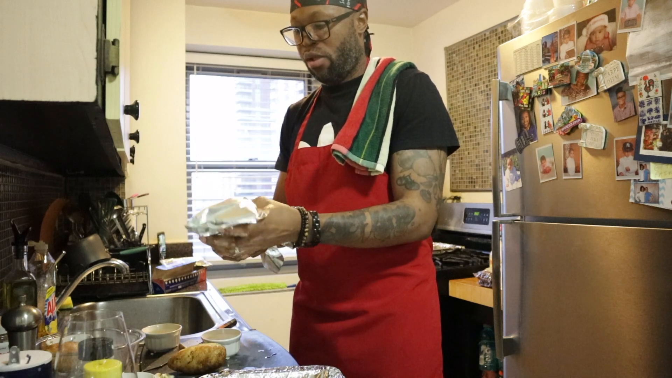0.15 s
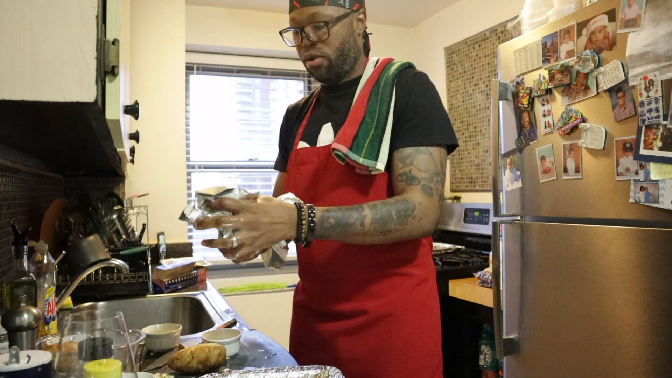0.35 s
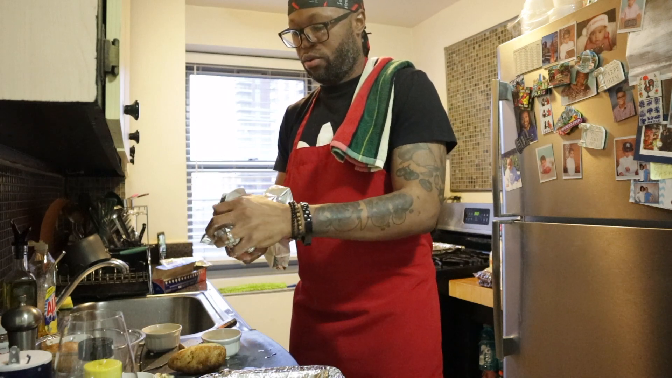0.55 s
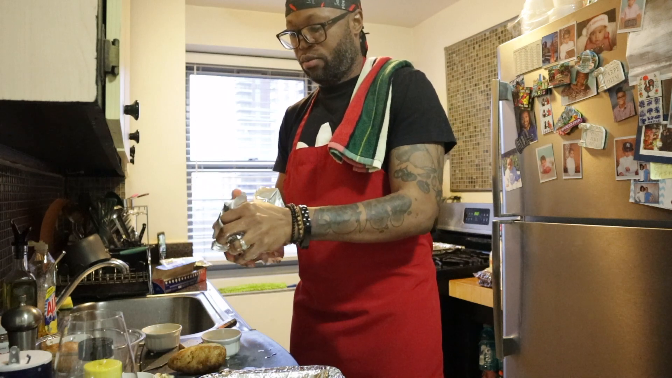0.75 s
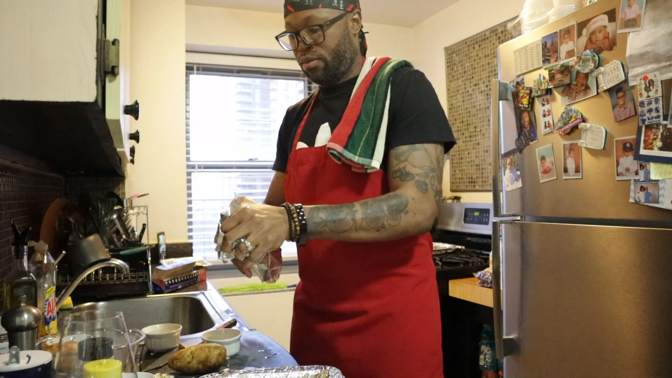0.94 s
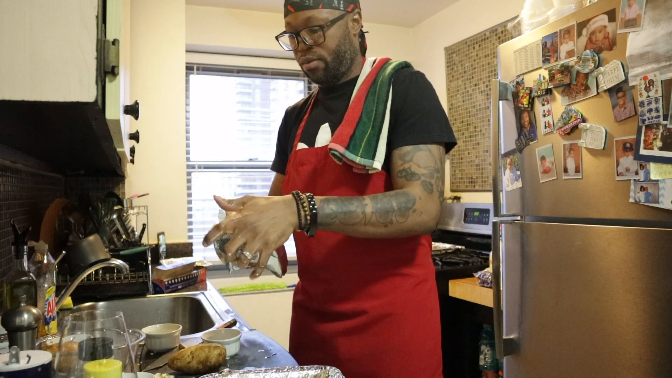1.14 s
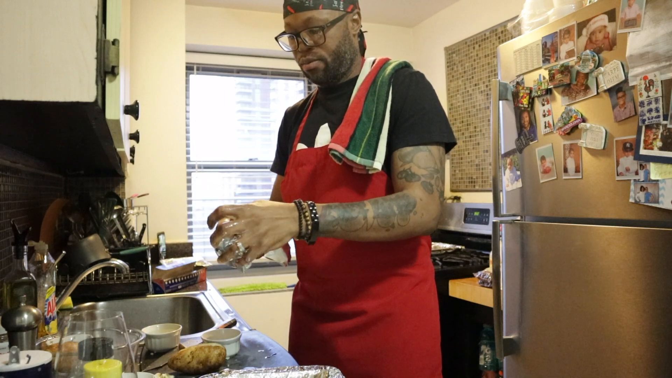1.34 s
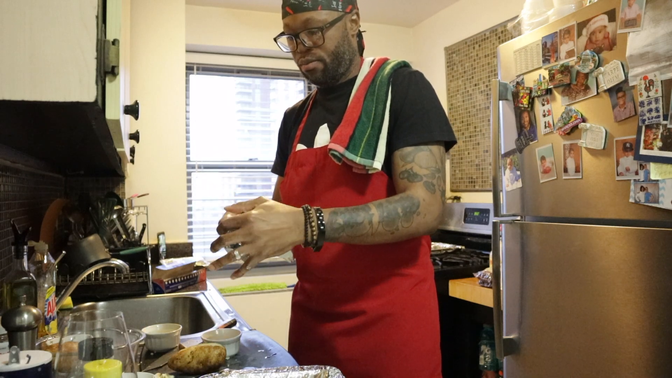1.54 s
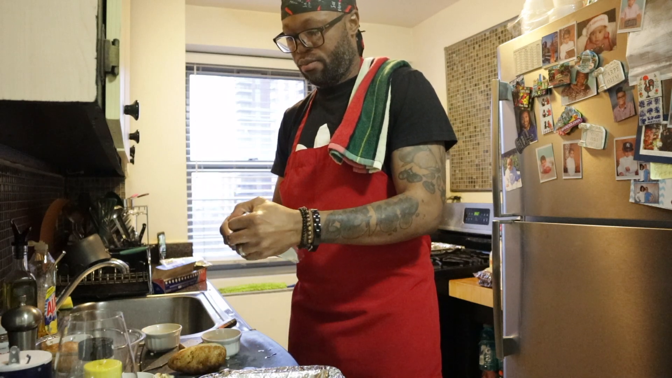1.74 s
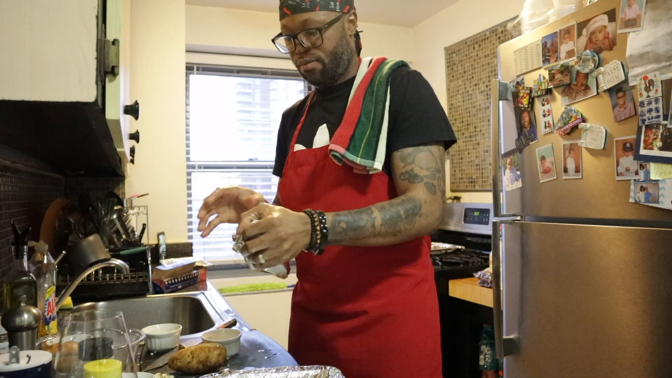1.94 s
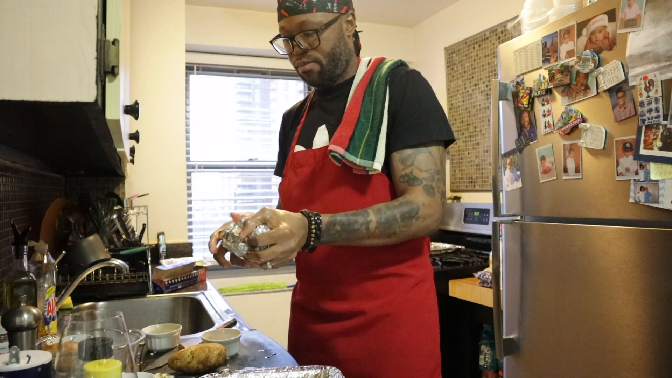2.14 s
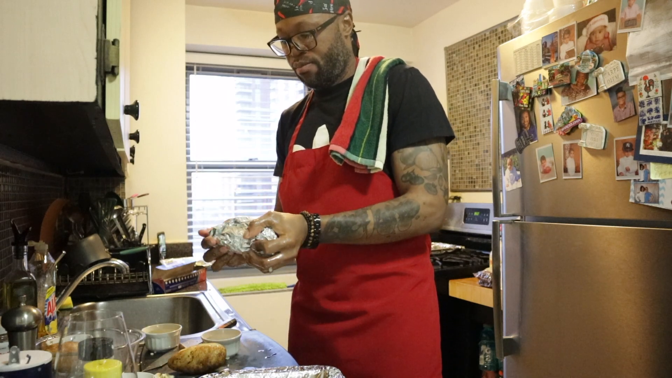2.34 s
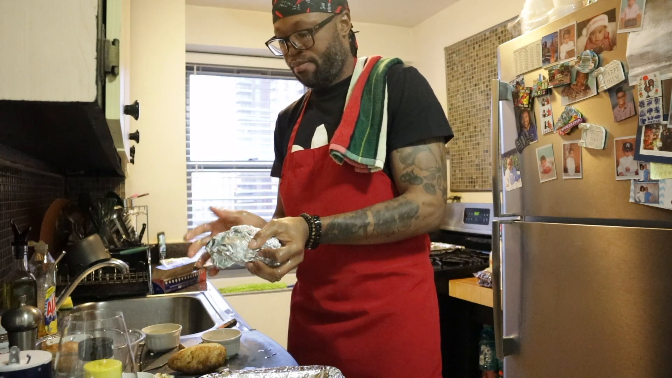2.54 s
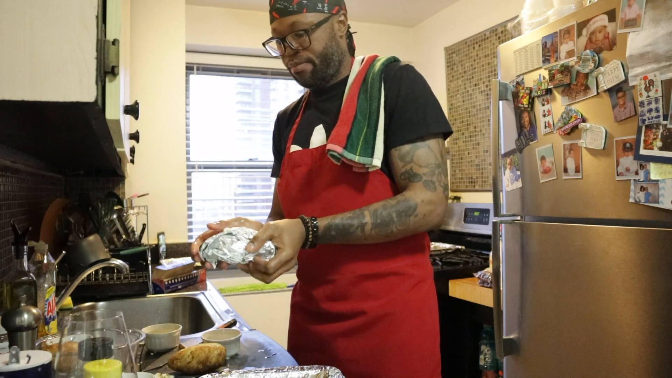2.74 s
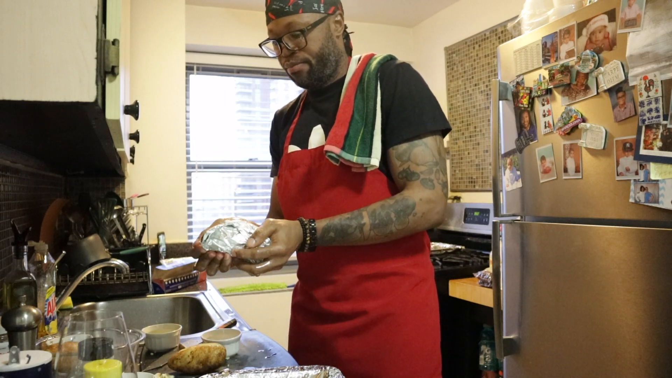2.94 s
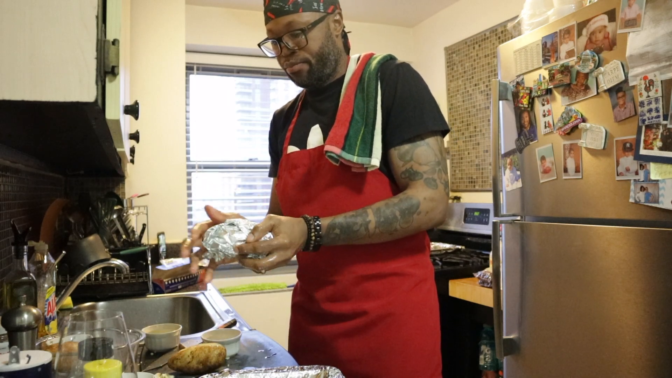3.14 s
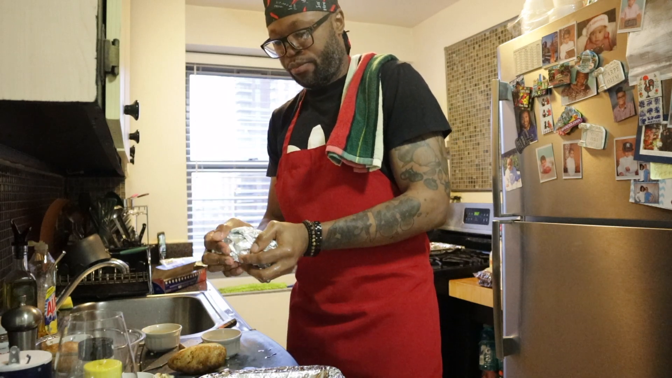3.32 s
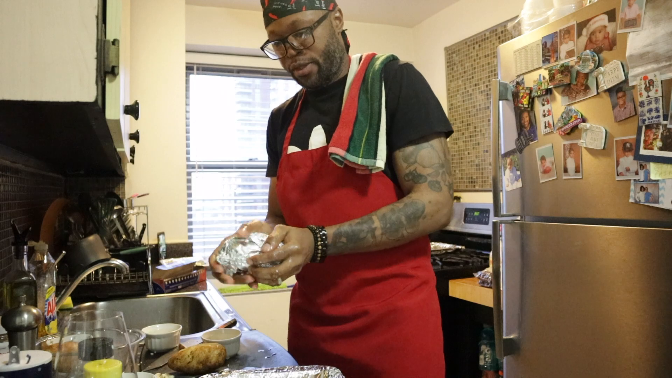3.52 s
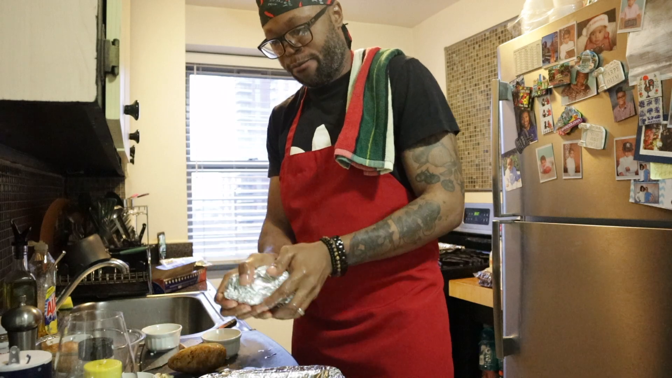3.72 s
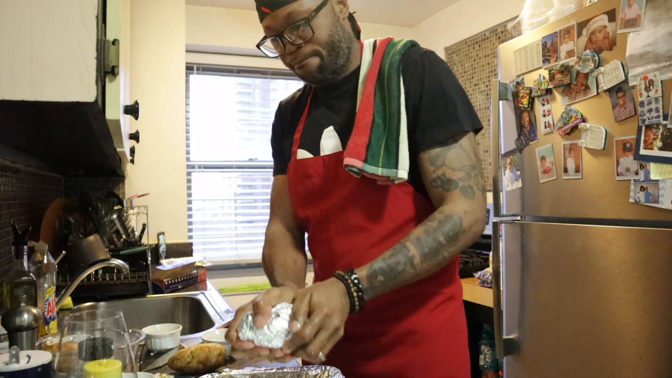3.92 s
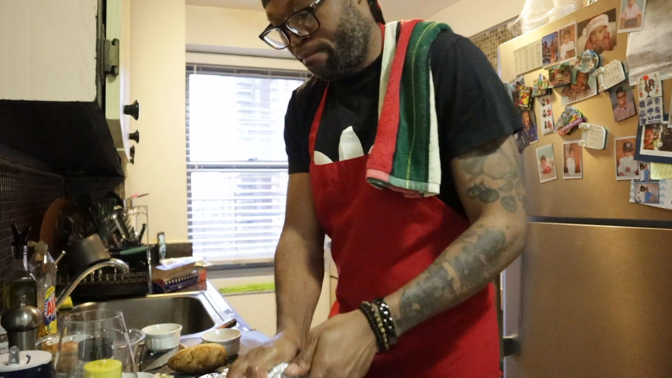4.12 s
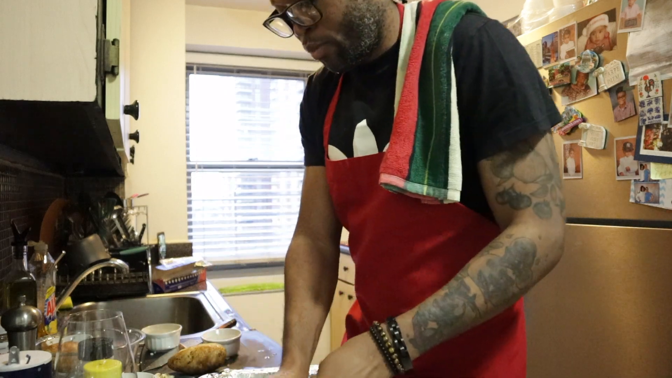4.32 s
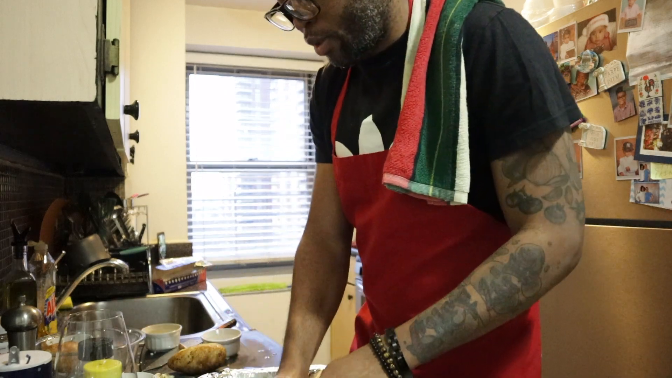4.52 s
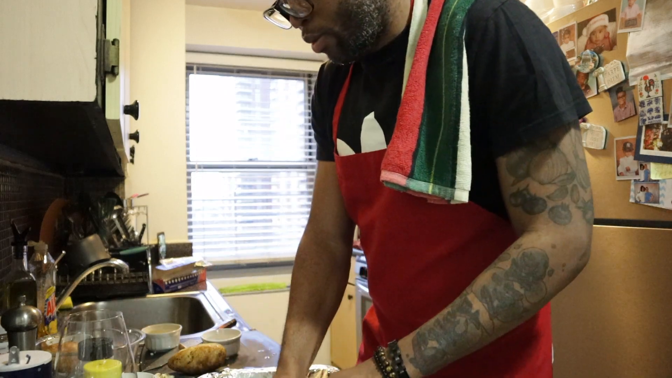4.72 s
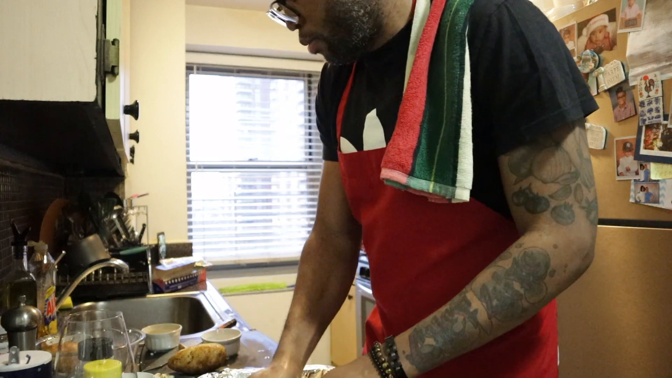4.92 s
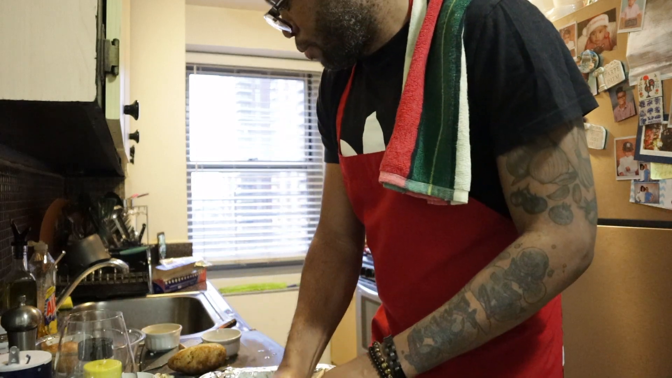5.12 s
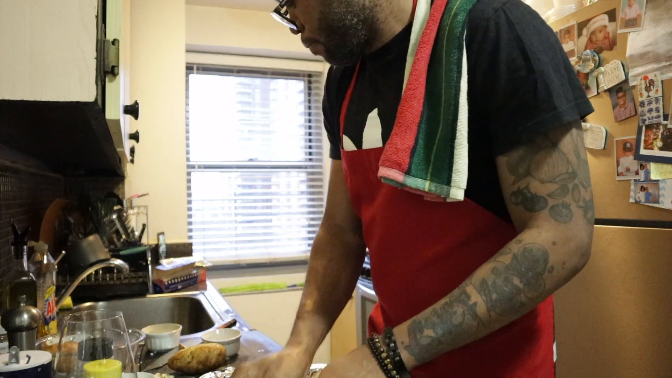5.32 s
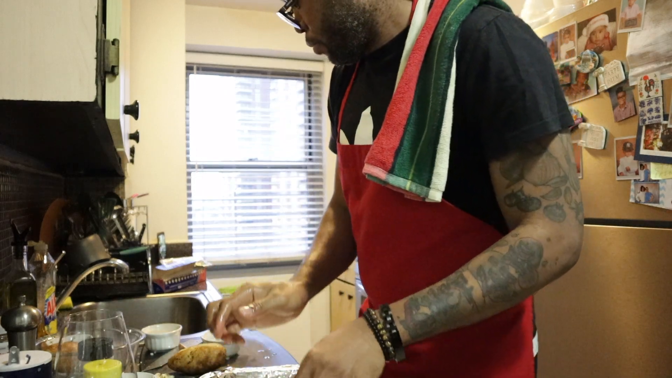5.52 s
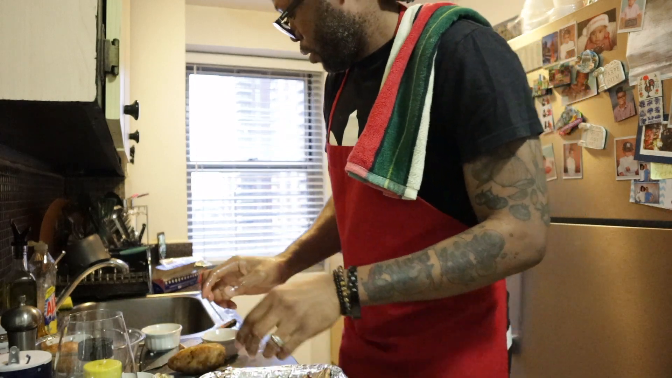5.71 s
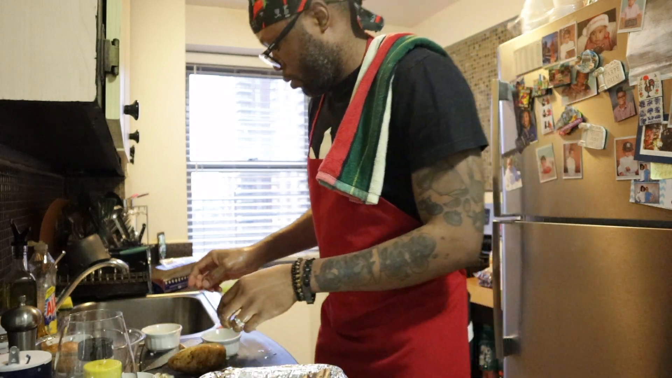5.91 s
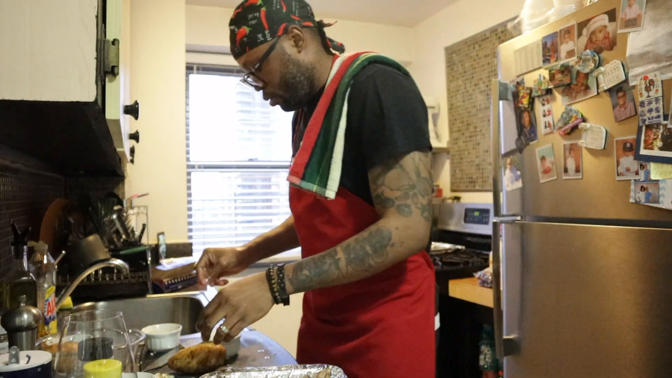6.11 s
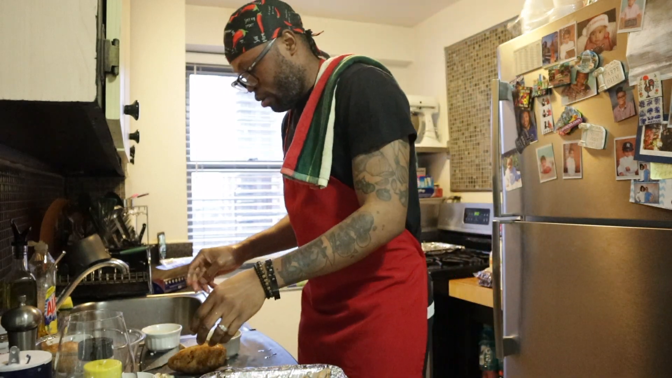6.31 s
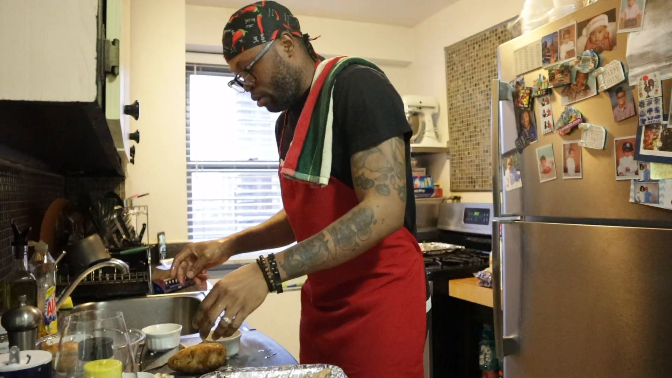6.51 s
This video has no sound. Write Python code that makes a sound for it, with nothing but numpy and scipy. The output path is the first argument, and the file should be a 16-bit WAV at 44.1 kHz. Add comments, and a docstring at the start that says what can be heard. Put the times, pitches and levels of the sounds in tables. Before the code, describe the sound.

Close, crackling foil is wrapped and pressed around a potato with dull bumps, ending with a dish tapping and sliding.

```python
"""Wrapping a potato in foil

A small kitchen, one microphone close to the counter, an appliance humming behind. Hands wrap aluminium
foil around a potato, squeeze it tight and press it down with dull bumps. Creases buckle in swarms of
tiny snaps, with single loud ones among them; on the counter the parcel takes on a hollow note.
At the end a dish is knocked lightly and slid over the counter."""
import sys
import numpy as np
from scipy import signal
from scipy.fft import rfft, irfft, next_fast_len
from scipy.io import wavfile
from scipy.ndimage import uniform_filter1d

SR = 44100
rng = np.random.default_rng(int(sys.argv[2]) if len(sys.argv) > 2 else 0)


def store_pcm(level_fs):
    """Save levels as 16-bit WAV."""
    pcm = np.round(np.clip(level_fs, -1, 1) * 32767).astype(np.int16)
    wavfile.write(sys.argv[1], SR, np.atleast_2d(pcm).T)


N = 289330
TIME = np.arange(N) / SR

# room tone: (frequency [Hz], relative level [dB])
ROOM_TONE = [(20, -18), (35, -9), (48, -9.5), (70, -2), (115, -3.5), (270, -1), (430, -3.5), (600, -9),
             (1050, -9.5), (1500, -15), (2200, -19.5), (5000, -23.5), (7000, -28.5), (15500, -31)]
# appliance in the background: (frequency [Hz], level [dB])
HUM_PARTIALS = [(74, -64.5), (91.5, -61), (153.5, -54), (243, -56.5), (294, -55.5), (344.5, -68),
                (414.7, -58.5)]
# decay of the kitchen: (frequency [Hz], t60 [s])
ROOM_DECAY = [(200, 0.29), (1000, 0.25), (3500, 0.22), (8000, 0.38), (15000, 0.089)]
# reverberation against the direct sound: (frequency [Hz], gain [dB])
ROOM_WET = [(1000, -3), (5000, -4), (9000, -7)]
# friction of the sliding dish: (time [s], level [dB])
SLIDE_LEVELS = [(5.86, -65), (5.916, -46), (5.952, -64), (5.956, -50), (6.106, -44.5), (6.202, -52.5),
                (6.304, -30), (6.38, -27.5), (6.476, -33), (6.56, -48.5)]
# colour of the sliding hiss as heard through the microphone: (frequency [Hz], relative level [dB])
HISS_AT_MIC = [(300, -15), (650, -10), (950, -3), (1600, -5.5), (2050, -1), (2700, 2.5), (3100, -3.5),
               (3600, 4), (4550, -6.5), (5200, -3), (6300, -11.5), (8000, -19.5), (11000, -26),
               (15500, -39)]
# light knocks on the dish: (time [s], peak level [dB])
DISH_KNOCKS = [(5.872, -37), (5.956, -27), (5.977, -37), (6.225, -36)]
# ring of the dish: (frequency [Hz], relative level [dB], t60 [s])
DISH_MODES = [(460, 1.5, 0.077), (563, 2, 0.027), (710, 5, 0.04), (820, 3, .035), (1083, 5.5, 0.051),
              (1250, -2, 0.041), (2350, -13, .04), (2920, -9, .04), (3460, -15, .04)]
# palms and counter bump the potato: (time [s], peak level [dB])
POTATO_BUMPS = [(.17, -38), (.47, -30), (.78, -29), (1.079, -41), (1.81, -33.5), (2.10, -29.5),
                (2.136, -29), (2.26, -35), (2.65, -32), (3.77, -38)]
# colour of a bump: (frequency [Hz], relative level [dB])
BUMP_COLOUR = [(60, -27), (150, 2), (350, 11.5), (700, 8.5), (1200, -5), (4000, -48)]
# the parcel lies on the counter: (time [s], contact [0-1])
COUNTER_CONTACT = [(4.33, 0.3), (4.4, 1), (4.74, 1), (4.82, 0.7), (5.1, 0.46), (5.3, 0.2)]
# colour of the crinkling as heard through the microphone: (frequency [Hz], relative level [dB])
CRINKLE_AT_MIC = [(130, -23), (300, -12.5), (560, -10), (850, -4), (1400, -3.5), (1800, -5.5), (2700, 1),
                  (3100, 0), (3550, 4), (4300, -3), (5100, -.5), (6600, -9), (11500, -9.5), (15800, -22)]
# squeezes; body (lows, wide panels) and sparkle (highs, tight creases) are relative to crackle (mids):
# (start [s], build-up [s], hold [s], crackle [dB], body [dB], sparkle [dB])
HAND_SQUEEZES = [(-0.034, 0.024, 0.072, -31.5, -6.5, -7.5), (0.087, 0.061, 0.044, -24.0, -7.5, -8.5),
                 (0.233, 0.071, 0.305, -27.0, -6.5, -7.5), (0.619, 0.057, 0.007, -29.5, -7.0, -7.0),
                 (0.73, 0.018, 0.086, -31.5, -4.0, -10.0), (0.886, 0.053, 0.043, -31.0, -5.5, -7.0),
                 (0.996, 0.026, 0.08, -27.0, -9.5, -8.0), (1.187, 0.061, 0.065, -29.0, -8.5, -9.5),
                 (1.328, 0.142, 0.088, -32.0, -9.5, -8.0), (1.499, 0.038, 0.011, -26.5, -7.5, -11.0),
                 (1.583, 0.053, 0.045, -28.5, -10.0, -7.5), (1.766, 0.088, 0.025, -28.5, -8.0, -7.5),
                 (2.074, 0.036, 0.208, -25.0, -7.0, -8.5), (2.332, 0.022, 0.132, -33.0, -10.0, -8.5),
                 (2.506, 0.039, 0.077, -32.0, -13.0, -8.0), (2.645, 0.013, 0.134, -27, -10.0, -7.5),
                 (2.852, 0.049, 0.058, -32.5, -9.0, -5.5), (3.032, 0.056, 0.089, -41.0, -12.5, -4.0),
                 (3.151, 0.054, 0.03, -29.5, -12.5, -7.0), (3.408, 0.084, 0.007, -31.0, -9.0, -6.5),
                 (3.573, 0.013, 0.114, -38.0, -12.5, -6.5), (3.752, 0.013, 0.139, -41.0, -7.5, -3.0),
                 (4.088, 0.06, 0.007, -39.0, -6.0, -6.5), (4.184, 0.013, 0.105, -43.5, -2.0, -8.0),
                 (4.329, 0.048, 0.032, -25.5, -8.5, -4.0), (4.428, 0.077, 0.211, -30.0, -7.0, -6.5),
                 (4.766, 0.07, 0.048, -35.0, -9.5, -8.5), (4.888, 0.053, 0.116, -32.0, -7.5, -8.5),
                 (5.133, 0.027, 0.018, -44.0, -7.0, -14.0), (5.279, 0.022, 0.075, -46.5, -2.0, -7.5)]
# fingers resting on the foil between squeezes: (body [dB], crackle [dB], sparkle [dB])
RESTING_TOUCH = (-59, -55.5, -57.5)
# loud single buckles: (time [s], crackle [dB], relative body [dB], relative sparkle [dB])
LOUD_BUCKLES = [(0.098, -23, -9, -14), (.1426, -22.5, -10, -11), (.1578, -26.5, 0, 3),
                (.193, -24, -20, 0.5), (.468, -26, -2.5, -14), (.823, -23.5, -7, -23),
                (0.888, -28.5, -15, -0.5), (1.0093, -24, -15, -21), (1.092, -25, -10, -8),
                (1.1662, -25.5, -8, -10), (1.226, -25, -9, -10), (1.29, -24.5, -15, -6),
                (1.4332, -26.5, -20, -7), (2.083, -35, -8, -10), (2.501, -37, -17, 9.5),
                (2.527, -23, -10.5, -16), (2.6444, -23, -17, -13), (2.7753, -19.3, -17, -14),
                (2.8228, -20.5, -14, -28), (3.0135, -36.5, -20.5, 2), (3.058, -30.5, -20, -14),
                (3.115, -23, -18, -16), (3.143, -22, -18.5, -4.5), (3.194, -24, -23, -22),
                (3.5847, -33, -17, -2), (3.6517, -29, -24, -6.5), (3.7327, -36, -22, -16),
                (3.7707, -28.5, -6, -8.5), (3.82, -34, -25, -6), (3.857, -41, -20, 7.5),
                (3.87, -44, -18, 8), (3.917, -47, -16, 11), (4.1904, -37, -21, 3), (4.2038, -31, -9, -4),
                (4.344, -33.5, -14, 4), (4.365, -28.5, -7.5, -1.5), (4.4723, -26, -21, -4),
                (4.6213, -21, -18, -7), (4.6415, -22.5, -11, -11), (4.6982, -24.5, -3.5, -13),
                (4.8457, -27.5, -22, -15), (4.9024, -23.5, -12, -12), (4.951, -21.5, -6, -10),
                (4.9995, -26.5, -12, -15), (5.0583, -24, -18, -13.5), (5.1634, -30, -20, -7),
                (5.241, -36, -25, -16), (5.2634, -40, -18, 1), (5.3242, -31.5, -6, -18),
                (5.3322, -34, -20, -18), (5.434, -40, -13, -4)]


def gain_of(db):
    """Decibels to amplitude."""
    return 10 ** (np.asarray(db) / 20)


def unit_rms(x):
    """Scales to rms 1."""
    return x / np.sqrt(np.mean(x ** 2) + 1e-20)


def value_at(points, hz):
    """Reads a table on a log-frequency axis."""
    f, value = np.transpose(points)
    return np.interp(np.log(hz + 1), np.log(f + 1), value)


def add(mix, s, sound):
    """Mixes a sound in at s seconds."""
    part = mix[max(round(s * SR), 0):][:len(sound)]
    part += sound[:len(part)]


def drift(hz):
    """Random wander of rms 1, up to about hz changes a second."""
    size = next_fast_len(N, real=True)
    lowpass = np.exp(-(np.fft.rfftfreq(size, 1 / SR) / hz) ** 2)
    return unit_rms(irfft(rfft(rng.standard_normal(size)) * lowpass, size)[:N])


def colour(x, points, size=2048):
    """Causal filter with the given spectrum, so that attacks stay sharp."""
    log_gain = np.log(gain_of(value_at(points, abs(np.fft.fftfreq(size, 1 / SR)))))
    taps = np.fft.ifft(np.exp(np.conj(signal.hilbert(log_gain)))).real
    return signal.oaconvolve(x, taps[:size // 2])[:len(x)]


def registers(x):
    """Splits a foil sound into body, crackle and sparkle."""
    edges = [(1500, "lowpass"), ([1500, 6500], "bandpass"), (6500, "highpass")]
    return [signal.sosfilt(signal.butter(4, hz, kind, fs=SR, output="sos"), x) for hz, kind in edges]


def steadied(x, size=1200):
    """Keeps the running rms near 1 and leaves the single cracks standing."""
    x = unit_rms(x)
    power = uniform_filter1d(uniform_filter1d(x ** 2, size), size)
    return x / np.sqrt(abs(power) + 1e-4)


def room_tone(level_db=-45):
    """The air of the kitchen: a steady, dark noise."""
    return gain_of(level_db) * unit_rms(colour(rng.standard_normal(N), ROOM_TONE))


def appliance_hum(waver=0.33, wander_rad=0.55):
    """An appliance hums in the background, each partial wavering in level and phase."""
    out = np.zeros(N)
    for hz, db in HUM_PARTIALS:
        amplitude = gain_of(db) * np.sqrt(2) * (1 + waver * drift(11))
        out += amplitude * np.sin(2 * np.pi * hz * TIME + wander_rad * drift(15))
    return out


def reflections(x, level_db=-10.5, first_s=0.001216, spread_s=.008, size=1500, count=10):
    """Counter and cupboards throw a few quick echoes back to the microphone."""
    delays = first_s + spread_s * rng.random(count)
    taps = np.zeros(size)
    taps[(delays * SR).astype(int)] = rng.choice([-1, 1], count) * np.exp(-delays / spread_s)
    return gain_of(level_db) * signal.oaconvolve(x, taps / np.linalg.norm(taps))[:N]


def reverberation(x, size=256, delay_frames=3):
    """The kitchen stores the energy of each band and gives it back as a dying diffuse wash."""
    framing = dict(fs=SR, nperseg=size, noverlap=size * 3 // 4)
    hz, t, spectra = signal.stft(x, **framing)
    kept_per_frame = gain_of(-60 * t[1] / value_at(ROOM_DECAY, hz)) ** 2
    power = uniform_filter1d(abs(spectra) ** 2, size=3, axis=0)
    arriving = np.pad(power, ((0, 0), (delay_frames, 0)))[:, :len(t)]
    stored = np.array([signal.lfilter([1 - k], [1, -k], p) for k, p in zip(kept_per_frame, arriving)])
    noise = signal.stft(rng.standard_normal(N), **framing)[2]
    wash = noise / noise.std() * np.sqrt(abs(stored)) * gain_of(value_at(ROOM_WET, hz))[:, None]
    return signal.istft(wash, **framing)[1][:N]


def dish_slide(trim_db=-0.2, grain_db=1.5):
    """Countless tiny contacts merge into a hiss that swells with the speed of the dish."""
    contacts = rng.standard_normal(N) * gain_of(grain_db * drift(110))
    friction_db = np.interp(TIME, *np.transpose(SLIDE_LEVELS), left=-120)
    return unit_rms(colour(contacts, HISS_AT_MIC)) * gain_of(friction_db + trim_db)


def dish_knocks(scuff_s=0.013, scuff=0.21, size=8192):
    """Each soft, scuffing blow rings the modes of the dish."""
    t, out = np.arange(size) / SR, np.zeros(N)
    ring = sum(gain_of(db - 60 * t / t60) * np.sin(2 * np.pi * hz * t) for hz, db, t60 in DISH_MODES)
    for s, db in DISH_KNOCKS:
        blow = (t == 0) + scuff * rng.standard_normal(size) * np.exp(-t / scuff_s)
        knock = signal.fftconvolve(blow, ring)[:size]
        add(out, s, gain_of(db) * knock / abs(knock).max())
    return out


def potato_bumps(rise_s=0.0018, decay_s=0.02, size=6000):
    """The soft potato answers a push with a dull puff."""
    t, out = np.arange(size) / SR, np.zeros(N)
    envelope = (1 - np.exp(-t / rise_s)) * np.exp(-t / decay_s)
    for s, db in POTATO_BUMPS:
        thud = colour(rng.standard_normal(size) * envelope, BUMP_COLOUR)
        add(out, s, gain_of(db) * thud / abs(thud).max())
    return out


def air_pocket(foil, hz=962.0, q=7.3, gain_db=4.5):
    """Air under the parcel gives the crackle a hollow note, strongest when pressed on the counter."""
    ring = signal.lfilter(*signal.iirpeak(hz, q, SR), foil)
    return gain_of(gain_db) * ring * np.interp(TIME, *np.transpose(COUNTER_CONTACT))


def squeezing(slacken_db_per_s=5., settle_db_per_s=142., let_go_s=5.46):
    """Hands grip, slacken and let the foil settle: gives crackle, relative body and sparkle in dB."""
    t = TIME[::64]
    release = gain_of(-settle_db_per_s * np.maximum(t - let_go_s, 0))
    power = np.outer(gain_of(RESTING_TOUCH), release) ** 2
    for start, build_s, hold_s, db, body, sparkle in HAND_SQUEEZES:
        grip = np.clip((t - start) / build_s, 0, 1)
        since_peak = t - start - build_s
        slacken_db = slacken_db_per_s * np.clip(since_peak, 0, hold_s)
        settle_db = settle_db_per_s * np.maximum(since_peak - hold_s, 0)
        power += np.outer(gain_of([body, 0, sparkle]), grip * gain_of(db - slacken_db - settle_db)) ** 2
    body, crackle, sparkle = (np.interp(TIME, t, 10 * np.log10(p + 1e-20)) for p in power)
    return crackle, body - crackle, sparkle - crackle


def tight_creases(treble_db, per_s=62.0, spread_db=3.5, follow=0.8, gain_db=-11.2):
    """The tightest creases pop with single, needle-sharp clicks, even under a light touch."""
    pops = (rng.random(N) < per_s / SR) * gain_of(spread_db * np.minimum(rng.exponential(1, N), 3))
    clicks = signal.sosfilt(signal.butter(2, [4940, 15500], "bandpass", fs=SR, output="sos"), pops)
    return clicks * gain_of(gain_db + follow * (treble_db - treble_db.max()))


def middling_creases(squeeze_db, per_s=30., trim_db=-2., spread_db=2.5, fade_s=.002, size=1024):
    """Creases give way at random, as loud as the squeeze, each ringing briefly at its own pitch."""
    t, out, s = np.arange(size) / SR, np.zeros(N), 0
    low_hz, high_hz, count = 1800, 6000, 260
    for wait, pitch, strength in rng.random((count, 3)):
        s -= np.log(1 - wait) / per_s
        hz = low_hz * (high_hz / low_hz) ** pitch
        burst = rng.standard_normal(size) * np.exp(-t / fade_s)
        ring = signal.lfilter(*signal.iirpeak(hz, Q=3, fs=SR), burst)
        db = squeeze_db[min(int(s * SR), N - 1)] + trim_db + spread_db * (2 * strength - 1)
        add(out, s, gain_of(db) * ring / ring[t < 2 * fade_s].std())
    return out


def large_creases(rise_s=.0008, crack_s=0.0014, shiver_s=0.0045, shiver_db=-6.0, grit_db=0.6,
                  trim_db=-1.4, body_trim_db=-0.5, sparkle_trim_db=1.0, size=2048):
    """A large crease gives way in a run of cracks; the sheet around it shivers for a moment."""
    t, out = np.arange(size) / SR, np.zeros(N)
    decay = np.exp(-t / crack_s) + gain_of(shiver_db) * np.exp(-t / shiver_s)
    envelope = (1 - np.exp(-t / rise_s)) * decay
    attack = t < .005
    for s, db, body, sparkle in LOUD_BUCKLES:
        noise, grit = rng.standard_normal((2, size))
        roughness = gain_of(grit_db * unit_rms(uniform_filter1d(grit, size=16)))
        crack = colour(noise * envelope * roughness, CRINKLE_AT_MIC)
        for tilt_db, part in zip((body + body_trim_db, 0, sparkle + sparkle_trim_db), registers(crack)):
            add(out, s + 0.00035, gain_of(db + trim_db + tilt_db) * part / part[attack].std())
    return out


def facet_ring(hz, decay_cycles=3, size=256):
    """A flipping facet rings for a few cycles at its own pitch."""
    t = np.arange(size) / SR
    ring = np.sin(2 * np.pi * hz * t) * np.exp(-t * hz / decay_cycles)
    return ring / np.linalg.norm(ring)


def crinkle(squeeze_db, body_db, sparkle_db, per_s=1500., idle_per_s=220., clump_db=2.0,
            crack_s=0.00074, ring_mix=0.42, trim_db=-2.4, body_trim_db=-2.0, sparkle_trim_db=-1.6):
    """Close to the microphone, swarms of foil facets flip in clumps, the more the harder the squeeze."""
    rate = idle_per_s + per_s * gain_of(.9 * (squeeze_db - squeeze_db.max()))
    flips = gain_of(clump_db * drift(47)) * (rng.random(N) < rate / SR)
    fade = np.exp(-2 / (crack_s * SR))
    crack_power = signal.lfilter([1 - fade], [1, -fade], flips ** 2)
    cracks = rng.standard_normal(N) * np.sqrt(crack_power)
    pitches_hz = np.geomspace(1500, 14000, 24)
    which = rng.integers(0, len(pitches_hz), N)
    rings = sum(signal.oaconvolve(flips * (which == k), facet_ring(hz))[:N]
                for k, hz in enumerate(pitches_hz))
    swarm = colour(cracks + ring_mix * rings, CRINKLE_AT_MIC)
    # the hand sets the energy that each register lets go in each moment
    tilts_db = (body_db + body_trim_db, 0, sparkle_db + sparkle_trim_db)
    sound = sum(gain_of(db) * steadied(part) for db, part in zip(tilts_db, registers(swarm)))
    return sound * gain_of(squeeze_db + trim_db)


def scene():
    """Foil, potato and dish up close, with the kitchen and its hum around them."""
    squeeze_db, body_db, sparkle_db = squeezing()
    foil = crinkle(squeeze_db, body_db, sparkle_db) + middling_creases(squeeze_db)
    foil += large_creases() + tight_creases(squeeze_db + sparkle_db)
    direct = foil + air_pocket(foil) + potato_bumps() + dish_knocks() + dish_slide()
    return (direct + reflections(direct) + reverberation(direct) + appliance_hum() + room_tone())[None]


def record(dry):
    """One microphone into a mono recorder whose band ends at 15.9 kHz."""
    lowpass = signal.firwin(511, 15900, window=("kaiser", 9), fs=SR)
    return signal.oaconvolve(dry, lowpass[None], "same")


dry = scene()
out = record(dry)
store_pcm(out)
```